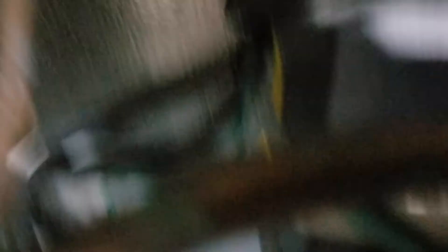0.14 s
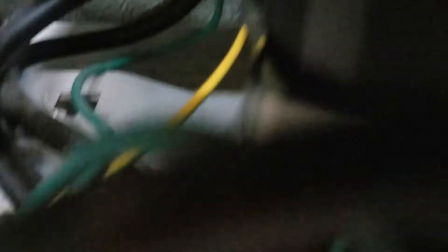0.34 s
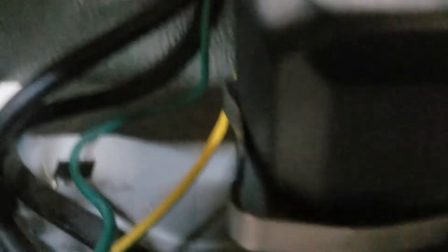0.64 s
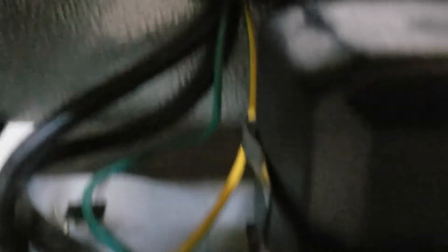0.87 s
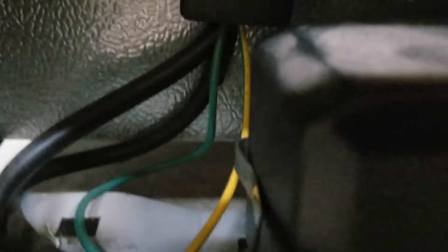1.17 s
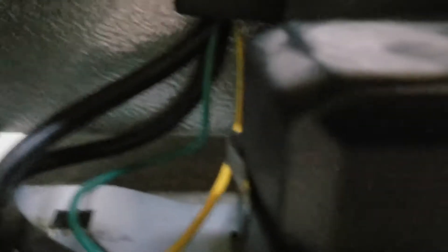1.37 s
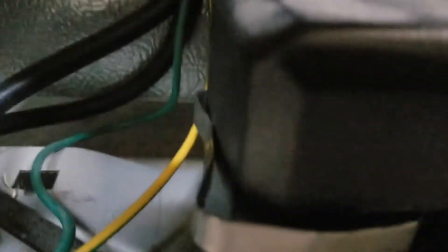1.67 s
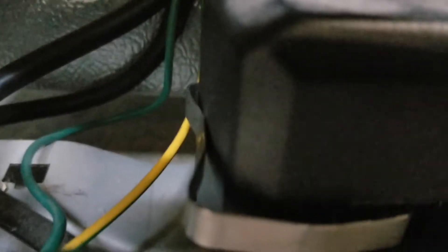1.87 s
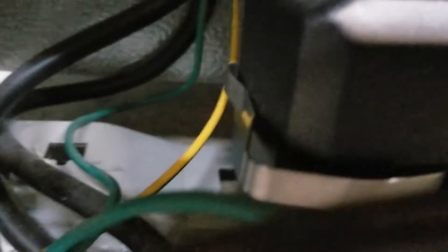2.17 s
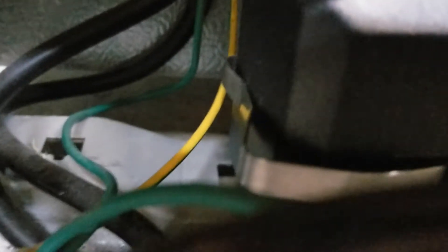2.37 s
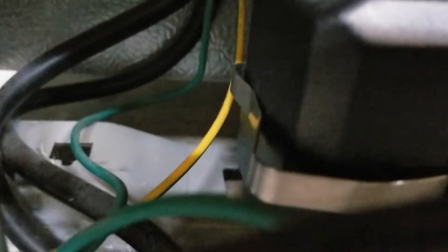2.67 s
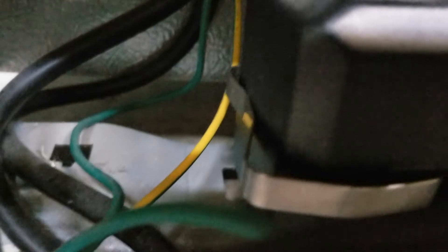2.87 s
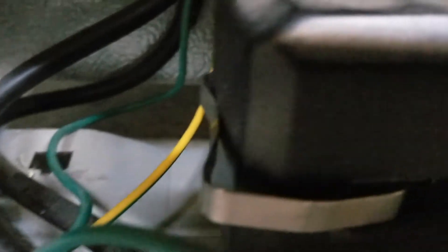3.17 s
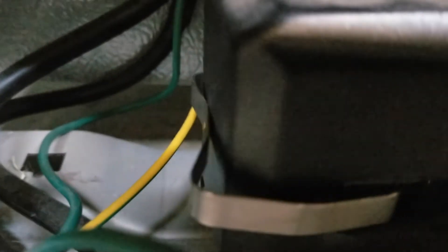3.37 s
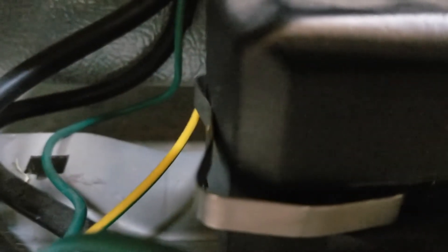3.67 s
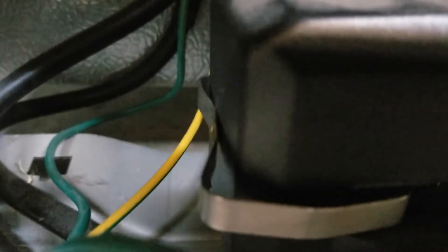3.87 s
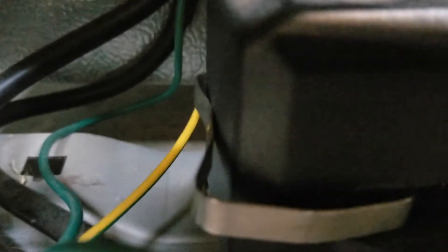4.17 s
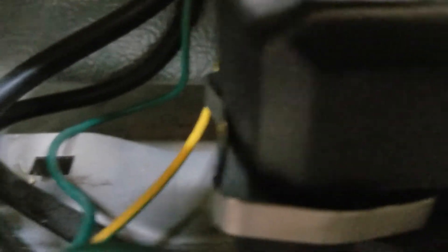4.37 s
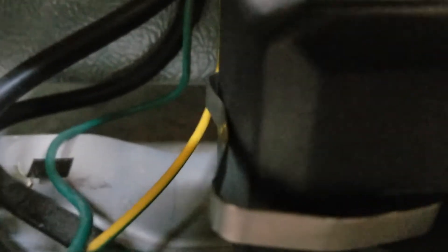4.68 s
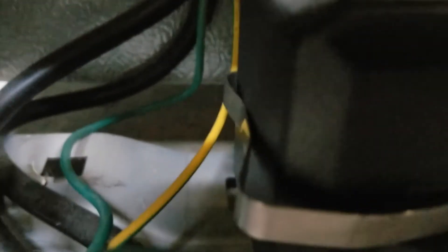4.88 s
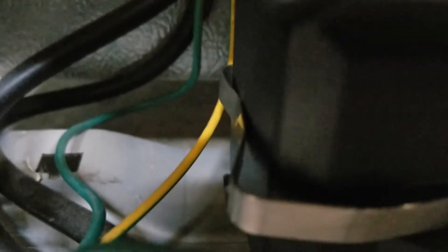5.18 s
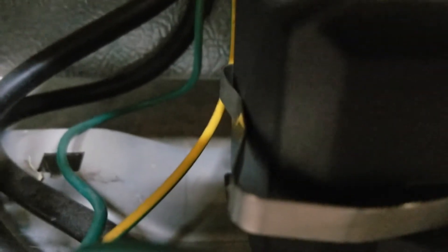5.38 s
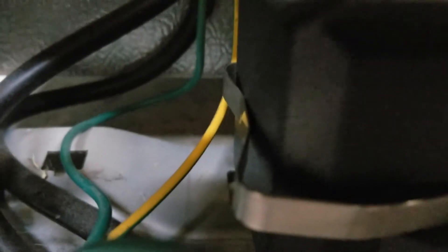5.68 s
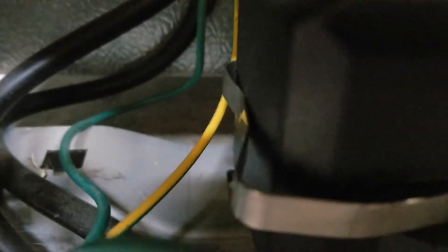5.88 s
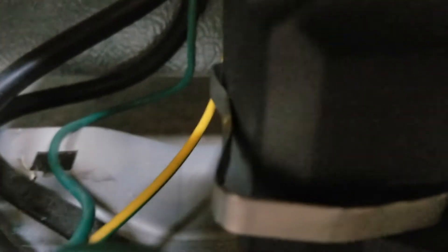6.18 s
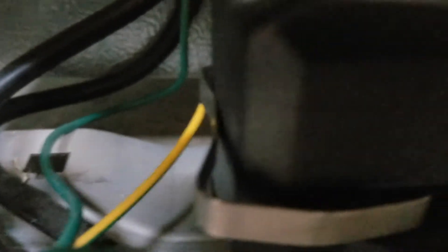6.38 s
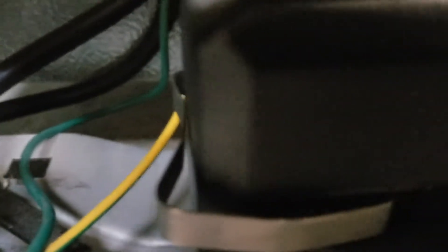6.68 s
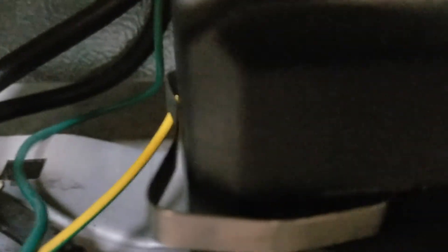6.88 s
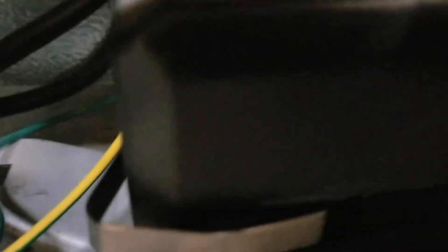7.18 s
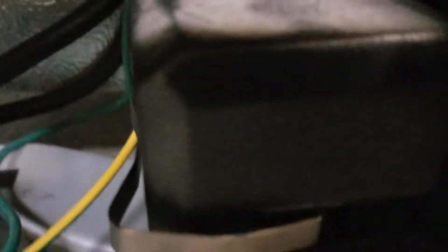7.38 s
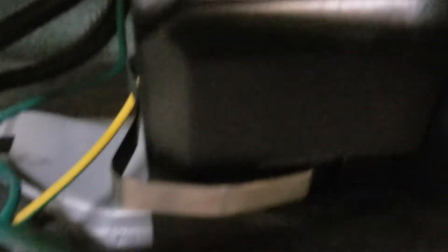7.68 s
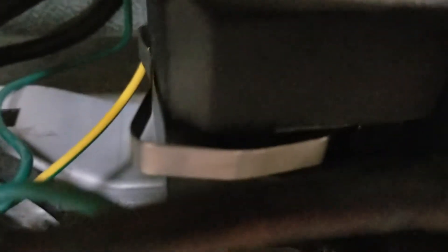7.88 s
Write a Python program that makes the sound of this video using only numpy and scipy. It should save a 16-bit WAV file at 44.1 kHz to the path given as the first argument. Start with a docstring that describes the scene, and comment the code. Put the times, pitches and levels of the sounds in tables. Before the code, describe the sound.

A phone bumps a pipe, a lorry shifts gear and booms past beyond the wall, and a stalled compressor hums between two metallic clicks.

```python
"""Close behind a small fridge: the stalled compressor's hum, steady sines at multiples of its magnetic
pull, swells up around one relay click and ends at another; each click is noise and ringing metal.
Outside a lorry changes gear and rolls past: sines at its engine orders boom through the wall over noise
bands of road, traffic and microphone hiss, with a turbo whine and faint high whistles.
The hand-held phone bumps a pipe, ringing its body, and brushes the wires: short bursts of noise."""
import sys
import numpy as np
from scipy import signal
from scipy.io import wavfile

SR = 44100
rng = np.random.default_rng(int(sys.argv[2]) if len(sys.argv) > 2 else 0)


def digitize_waveform(pressure):
    """Quantize a signal to 16-bit integers and store it at the path in sys.argv[1].

    Rows of a 2-D input are taken as channels; values are limited to [-1, 1].
    """
    field = np.atleast_2d(pressure).T
    bounded = np.clip(field, -1, 1)
    quanta = np.round(bounded * 32767).astype(np.int16)
    wavfile.write(sys.argv[1], SR, quanta)


def boost(x):
    """Linear amplitude factor 10**(x/20) for a level x in decibels (scalar or array-like)."""
    u = np.asarray(x, float) / 20
    return 10 ** u


N = 354784


def rms_one(x):
    """Normalisation: scale to unit root mean square."""
    return x / np.sqrt(np.mean(x ** 2) + 1e-20)


def in_time(rows):
    """Linear interpolation: the columns after the time, one value per sample."""
    s, *columns = np.transpose(rows)
    return [np.interp(np.arange(N) / SR, s, c) for c in columns]


def at_hz(points, hz):
    """Spectral interpolation: read a spectrum on a logarithmic frequency axis."""
    points_hz, db = np.transpose(points)
    return np.interp(np.log(hz), np.log(points_hz), db)


def sides(db):
    """Interaural level difference: left and right gains, left minus right in dB."""
    return boost(np.array([db / 2, -db / 2]).reshape(2, -1))


def gate(start, end, fade):
    """Linear envelope: 1 between two moments, with fades inside them, all in seconds."""
    t = np.arange(N) / SR
    return np.clip(np.minimum(t - start, end - t) / fade, 0, 1)


def drift(rate_hz):
    """Random modulation: noise through two equal low-pass poles at rate_hz, of spread 1."""
    r = np.exp(-2 * np.pi * rate_hz * 40 / SR)  # computed at every 40th sample
    slow = signal.lfilter([1], [1, -2 * r, r * r], rng.standard_normal(N // 40 + 2002))[2000:]
    return np.interp(np.arange(N) / 40, np.arange(len(slow)), rms_one(slow))


def ring(clicks, hz, t60):
    """Damped resonance: a unit click starts a sine of height 1 that falls 60 dB in t60 seconds."""
    r, w = boost(-60 / (t60 * SR)), 2 * np.pi * hz / SR
    return signal.lfilter([0, np.sin(w)], [1, -2 * r * np.cos(w), r * r], clicks + 1e-18)


def band(x, low_hz, high_hz):
    """Band-pass filtering: keep the partials between two frequencies."""
    return signal.sosfilt(signal.butter(3, [low_hz, high_hz], "band", fs=SR, output="sos"), x)


def tone(hz):
    """Phase integration: a sine of rms 1 along a pitch curve."""
    return np.sqrt(2) * np.sin(2 * np.pi * np.cumsum(hz) / SR)


# Compressor hum. Each row: multiple of the magnetic pull rate, mean level in dB, left-right in dB.
HUM = [(1, -40, 0), (4, -55, 15), (33, -94.5, 3), (36, -100, 3), (47, -100, 3), (48, -97, 3)]


def compressor():
    """Magnetostatic pull: a locked rotor is pulled twice per mains cycle, and the shell sounds multiples."""
    pull_hz, on_s, off_s = 119.95, 2.54, 5.836
    hum = 0
    for k, db, pan_db in HUM:
        flicker_db = (1 + k / 20) * drift(12)  # high multiples are less steady
        hum = hum + sides(pan_db) * boost(db + flicker_db) * tone(np.full(N, k * pull_hz))
    return hum * np.minimum(gate(on_s, 9, 0.82), gate(0, off_s, 0.016))


# Start relay, then overload switch. Each row: start in seconds, level in dB, left-right in dB.
RELAY = [(3.1452, -27, 5.5), (5.832, -40, 4.5)]
# Metal parts, one list a switch. Each row: frequency in Hz, relative level in dB, t60 in seconds.
RELAY_MODES = [
    [(2600, -28.5, 0.058), (3214, -18, 0.031), (3960, -14, 0.054), (4050, -13.5, 0.05), (4210, -16.5, .035),
     (4570, -11.5, 0.03), (5270, -15.5, 0.022), (7080, -18.5, 0.047), (7700, -20, 0.041),
     (10500, -17.5, 0.037), (12030, -17.5, .04), (14000, -15, .03), (14200, -34, 0.11), (15600, -14, .02)],
    [(3030, -5.5, 0.022), (4700, -14.5, .025), (5900, -12, 0.027), (6600, -12.5, 0.018),
     (10200, -11.5, 0.019), (12230, -15, .02), (13742, -7.5, .025), (15000, -6, 0.0254), (15600, -7.5, .03)],
]
# Spectrum of the crack, one list a switch. Each row: frequency in Hz, relative level in dB per Hz.
RELAY_CRACK = [
    [(1180, -55), (2000, -26), (3430, -17), (3950, -10), (4920, -13), (8000, -3), (8890, -18.5),
     (13700, -10), (16500, -17.5)],
    [(1470, -30.5), (2500, -0.5), (3170, 2), (4080, -31), (4520, -7.5), (5870, -8.5), (7860, -9.5),
     (15100, -3.5), (16500, -12.5)],
]


def evenly(rings, t60):
    """Energy normalisation: each channel gets that of a sine of height 1 dying in t60 seconds."""
    energy = (rings ** 2).sum(axis=1, keepdims=True)
    return rings * np.sqrt(t60 * SR / (4 * np.log(1000)) / energy)


def relay(rattle_s=.0035, crack_t60=.022, tail_db=-22, tail_t60=.2):
    """Impact excitation: rattling contacts give a crack, ringing metal and a short tail in the recess."""
    out, t = np.zeros((2, N)), np.arange(SR // 2) / SR
    edges = np.geomspace(2000, 16500, 17)
    rise = np.clip(t / .002, 0, 1) ** 2  # light touches first, then the full snap
    fall = boost(-60 * np.maximum(t - rattle_s, 0) / crack_t60)
    tail = boost(tail_db - 60 * t / tail_t60)
    for (s, db, pan_db), modes, crack in zip(RELAY, RELAY_MODES, RELAY_CRACK):
        white = rng.standard_normal((2, len(t)))
        white = white + 0.55 * white[::-1]  # the ports hear partly the same
        noise = 0
        for low, high in zip(edges, edges[1:]):
            noise = noise + boost(at_hz(crack, np.sqrt(low * high))) * band(white, low, high)
        touches = (t < rattle_s) * (rng.random(len(t)) < 6000 / SR)  # 6000 a second on average
        clicks = rng.standard_normal(len(t)) + .4 * rng.standard_normal((2, len(t)))
        clicks = clicks * rise * touches
        clicks = clicks / np.sqrt((clicks ** 2).sum(axis=1, keepdims=True) + 1e-12)
        rings = 0
        for hz, mode_db, t60 in modes:
            gain = boost(mode_db + rng.normal(0, 1.0, (2, 1)))
            rings = rings + gain * evenly(ring(clicks, hz, t60), t60)
        at = round(s * SR)
        snap = boost(-11.0) * rms_one(noise) * rise * (fall + tail) + rings
        out[:, at:at + len(t)] += boost(db) * sides(pan_db) * snap
    return out


# Engine coming, changing gear, passing, leaving.
# Each row: time in seconds, engine cycle rate in Hz, level in dB before order and wall gains.
LORRY = [(.25, 42.63, -69), (.5, 44.06, -69.5), (.77, 45.82, -58), (1.18, 45.73, -58.5),
         (1.449, 50.17, -56), (1.54, 50.25, -63.5), (1.6, 42.2, -60), (1.81, 43.76, -52.5),
         (2.31, 43.79, -58.5), (2.85, 43.76, -43.5), (3.199, 42.7, -49.5), (3.441, 41.48, -43.5),
         (3.67, 39.51, -44.5), (3.861, 38.1, -39.5), (3.99, 37.04, -41.5), (4.07, 35.9, -46),
         (4.3, 34.35, -45), (4.9, 34.09, -48), (5.2, 33.88, -51), (5.8, 33.47, -46.5), (6.42, 32.52, -51),
         (6.75, 31.55, -45.5), (7.0, 31.21, -54), (7.25, 31.7, -63.5)]
# Engine orders. Each row: multiple of the cycle rate, then gains in dB from afar, from the front, from behind.
ORDERS_HEARD = [(2, 3, 1.5, -5.5), (3, 10, 11.5, -4), (4, -1.5, 5, 13.5), (5, -5, -5, -12),
                (6, 1.5, -1.5, -6.5), (7, -13.5, -3, -7), (8, -7, -3, -5.5), (9, -7, 0, -9.5),
                (10, -13, -15.5, -6.5), (11, -17, -12, -5.5)]
# What wall and room let through. Each row: frequency in Hz, gain in dB.
WALL = [(60, 1.5), (78, 1.5), (87, 6), (100, -3.5), (118, -7.5), (131, 3), (145, 1), (170, 4), (200, -1.5),
        (230, -2.5), (262, 8.5), (280, 2), (305, 6.5), (330, -2.5), (350, -3.5), (400, -13), (520, -15)]
# Brief dips of one order. Each row: centre in seconds, multiple, depth in dB, half width in seconds.
DIPS = [(1.2, 6, -11, 0.63), (1.0, 2, -8, 0.3), (3.6, 3, -12, .6), (3.4, 2, -11, .15), (2.8, 7, -10, .2),
        (1.9, 3, -16.5, 0.39), (4.09, 4, -5, 0.047), (4.57, 4, -19, 0.19), (6.54, 4, -9.5, .1)]


def lorry(waver_db=2.0, wander=.25):
    """Harmonic radiation: wavering engine orders swell as they glide through resonances of wall and room."""
    hz, level_db = in_time(LORRY)
    t, turn = np.arange(N) / SR, 2 * np.pi * np.cumsum(hz) / SR
    near = gate(2.366, 99, 0.42)  # comes into view
    behind = gate(3.89, 99, 0.54)  # turns its rear
    drone = 0
    for k, far_db, front_db, rear_db in ORDERS_HEARD:
        aspect_db = far_db + (front_db - far_db) * near + (rear_db - front_db) * behind
        db = level_db + aspect_db + at_hz(WALL, k * hz) + waver_db * drift(9.9)
        for s, order, depth_db, width in DIPS:
            if order == k:
                db = db + depth_db * np.clip(1 - abs(t - s) / width, 0, 1)
        phase = rng.uniform(0, 2 * np.pi) + wander * drift(6.4)  # radians
        drone = drone + boost(db) * np.sqrt(2) * np.sin(k * turn + phase)
    leaving_pan_db = -2.5 * behind
    return sides(leaving_pan_db) * drone * gate(LORRY[0][0] - .1, LORRY[-1][0] + 0.15, .1)


# Whine of the turbo. Each row: time in seconds, frequency in Hz, level in dB.
TURBO = [(2.2, 6107, -102), (2.6, 6600, -87.5), (3.5, 6970, -79.5), (4.2, 7060, -83), (4.5, 6600, -83),
         (4.7, 6370, -102)]


def turbo():
    """Amplitude modulation: a gliding sine times random drift becomes the breathy whine of the turbo."""
    hz, db = in_time(TURBO)
    return boost(db) * tone(hz) * [drift(200), drift(200)] * gate(TURBO[0][0], TURBO[-1][0], .05)


# Contacts of the bump. Each row: time in seconds, left push in dB, right push in dB, cut-off in Hz.
BUMP = [(.1631, -7.5, -4.2, 2600), (.1641, 3.9, -15, 1315), (.1683, -1.6, -23.5, 494),
        (.1760, -16, -20, 1250), (.1770, -8, -32, 800)]
# Phone body. Each row: frequency in Hz, t60 in seconds, swing at the left port, swing at the right port.
# Opposite signs where the body rocks.
PHONE = [(60, .1, -.0051, .0025), (108, .027, -.034, .0033), (244, .0135, -.19, .036),
         (1215, .0035, 1.44, -1.35), (1850, .0024, .09, 1.75), (3450, .05, .004, .012),
         (3720, .07, .005, .016), (4700, .0025, .6, 1.3), (6800, .005, .25, .3)]


def bump():
    """Modal excitation: soft contacts, each a low-passed push, and a slower shove ring the phone body."""
    pushes, shove = np.zeros((2, N)), np.zeros(N)
    for s, left_db, right_db, cut_hz in BUMP:
        click = np.zeros(N)
        click[round(s * SR)] = -1
        push = signal.lfilter(*signal.butter(3, cut_hz, fs=SR), click + 1e-18)
        pushes += boost([[left_db], [right_db]]) * push
    shove[round(.1667 * SR)] = -boost(27.7)
    shove = signal.sosfilt(signal.butter(3, 93, fs=SR, output="sos"), shove + 1e-18)
    rock, knock = 0, 0
    for hz, t60, left, right in PHONE:
        rock = rock + ring(shove, hz, t60) * left
        knock = knock + ring(pushes, hz, t60) * [[left], [right]]
    rock = rock * [[1], [-.7]]  # the shove tips the body: the ports swing against each other
    sway = ring(shove, 60, .11) * [[-.001], [.006]]  # slow
    return rock + sway + knock


# Wires on the case. Each row: start in seconds, level in dB 10 above the initial rms, left-right in dB.
TICKS = [(0.253, -51.5, 14), (0.3406, -52, 12), (0.372, -57.5, 12.5), (0.798, -49, 8), (6.3967, -53.5, 3)]


def ticks():
    """Transient decay: wires touching the case give bright noise that falls 60 dB in 13 ms."""
    out, t = np.zeros((2, N)), np.arange(N) / SR
    bright = rms_one(band(rng.standard_normal((2, N)), 2200, 16000))
    for s, db, pan_db in TICKS:
        fall = boost(db - 10 - 60 * np.maximum(t - s, 0) / 0.013) * (t >= s)
        out += fall * sides(pan_db) * bright
    return out


# Brushing, air puffs, the crack of the bump and a switch rattle.
# Each row: start in seconds, time to fall 12 dB in seconds, level in dB, low edge in Hz, high edge in Hz.
NOISE_BURSTS = [(0.167, 0.008, -54, 2177, 6980), (0.0, 0.12, -69.5, 1995, 5470),
                (0.0, 0.4, -81, 9900, 15770), (0.1627, 0.0013, -29.5, 2600, 7310),
                (0.1628, 0.0023, -44, 10000, 15800), (0.172, 0.2, -69.5, 2530, 7460),
                (0.503, 0.046, -72, 1790, 6760), (0.602, 0.28, -76.5, 2480, 7160),
                (0.778, 0.036, -73, 2480, 7000), (3.364, 0.18, -54.5, 2110, 2870),
                (3.37, .12, -61, 3000, 7150), (4.909, .015, -70, 4500, 5537),
                (5.857, 0.038, -67.5, 2810, 3800)]


def noise_bursts():
    """Exponential decay: brushing, puffs, the bump's crack and a switch rattle as band-passed noise."""
    out, t = np.zeros((2, N)), np.arange(N) / SR
    white = rng.standard_normal((2, N))
    for s, length, db, low_hz, high_hz in NOISE_BURSTS:
        fall = boost(-12 * np.clip((t - s) / length, 0, 9)) * gate(s, s + 3 * length, length / 10)
        out += boost(db) * fall * rms_one(band(white, low_hz, high_hz))
    return out


# Thin high whistle. Each row: time in seconds, mean frequency in Hz, mean level in dB.
WHISTLE = [(.6, 10080, -100), (1.6, 10620, -99), (2.6, 10580, -90.5), (3.1, 10560, -88),
           (3.9, 10500, -94.5), (4.2, 10520, -95.5), (5.3, 10280, -92.5), (6.4, 10200, -99.5),
           (7.6, 10020, -99.5), (8.04, 10250, -109)]


def whistle():
    """Random modulation: a faint high sine, unsteady in pitch and level, mostly on the left."""
    hz, db = in_time(WHISTLE)
    thin = boost(db + 3.6 * drift(25)) * tone(hz + 30 * drift(40))
    return sides(5.4) * thin * gate(WHISTLE[0][0], 9, .3)


# Short high chirp. Each row: time in seconds, mean frequency in Hz, level in dB.
CHIRP = [(3.88, 8820, -100), (3.93, 9150, -76), (3.97, 9100, -76), (4.02, 8900, -76.5), (4.05, 8900, -105)]


def chirp():
    """Frequency modulation: a brief high sine with an unsteady glide, mostly on the left."""
    hz, db = in_time(CHIRP)
    short = boost(db) * tone(hz + 30 * drift(40))
    return sides(4.0) * short * gate(CHIRP[0][0], CHIRP[-1][0], .01)


def steady_tone():
    """Narrow-band modulation: a faint low sine, wavering in pitch and level, stays throughout."""
    return boost(-60.5 + 3 * drift(5)) * tone(296.8 + 1.5 * drift(3.5))


# Spectrum of the background: traffic rumble low, microphone hiss above about 2.5 kHz.
# Each row: frequency in Hz, relative level in dB per Hz.
COLOUR = [(22, -22), (35, -13), (55, 3.5), (116, 1), (160, -1.5), (281, -5), (403, -17), (620, -19),
          (850, -17), (1500, -23), (1700, -31), (2400, -42.5), (2800, -54.5), (3300, -53.5)]
TREBLE = [(4200, -60), (6300, -58.5), (7600, -61), (9000, -61.5), (10500, -56), (13000, -49.5),
          (15500, -49.5)]
# Stereo correlation. Each row: frequency in Hz, left-right likeness from -1 to 1.
LIKENESS = [(60, 1), (120, 0.8), (240, 1), (480, .6), (950, 0.32), (1900, 0.23), (3800, 0), (15000, 0)]
# Stereo balance. Each row: frequency in Hz, left-right in dB.
LEAN = [(60, 0), (110, -2), (200, -4), (380, 6.5), (700, -3), (1290, -1.5), (2380, -3.5), (4400, 2),
        (8120, 1.5), (15000, 5)]
# Swells of the background, as of distant traffic. Each row: time in seconds, relative level in dB.
SWELLS = [(0, -2), (.5, -4.5), (2.3, -4), (2.9, 1), (6.5, -0.5), (8.04, 1)]
# Road noise of the lorry. Each row: time in seconds, level in dB against its reference.
ROAD = [(0, -29), (1.2, -21.5), (2.3, -17.5), (2.8, -6.5), (3.38, -1), (3.9, -5), (4.4, -8), (5.3, -11.5),
        (6.1, -15), (8.04, -20)]
# Road reference over the background. Each row: frequency in Hz, ratio in dB.
ROAD_OVER_BACKGROUND = [(30, 5), (70, 0), (330, 12), (1100, 2.5), (4500, 19), (8000, 10), (13000, -2.5)]


def background(patchy_db=1.5):
    """Incoherent summation: powers of background and lorry road noise add in quarter-octave bands."""
    (swell_db,), (road_db,) = in_time(SWELLS), in_time(ROAD)
    base, road = boost(swell_db) ** 2, boost(road_db) ** 2
    edges, out = 22 * 2 ** (np.arange(39) / 4), 0
    white = rng.standard_normal((2, 2, N + 8192))  # neighbouring bands use different noise
    for k, (low, high) in enumerate(zip(edges, edges[1:])):
        mid, side = band(white[k % 2], low, min(high, 15800))[:, 8192:]
        hz = np.sqrt(low * high)
        swell = np.sqrt(base + road * boost(at_hz(ROAD_OVER_BACKGROUND, hz)) ** 2)
        alike = at_hz(LIKENESS, hz)
        colour = boost(at_hz(COLOUR + TREBLE, hz) + patchy_db * drift(8))
        stereo = np.sqrt(1 + alike) * mid + np.sqrt(1 - alike) * side * [[1], [-1]]
        out = out + swell * colour * sides(at_hz(LEAN, hz)) * stereo
    ending = out[:, -N // 9:]
    return boost(-39.5) * out / np.sqrt(np.mean(ending ** 2))  # the last ninth sets the level


def scene():
    """Superposition at two ports: background, lorry drone and low tone reach the right 15 samples late."""
    left, right = background() + lorry() + steady_tone()
    lagged = np.array([left, np.roll(right, 15)])
    fridge = compressor() + relay()
    contacts = bump() + ticks() + noise_bursts()
    return lagged + fridge + contacts + whistle() + chirp() + turbo()


def top_cut(x):
    """Nothing passes above the cut-off."""
    return signal.sosfilt(signal.butter(12, 17140, fs=SR, output="sos"), x)


def record(dry):
    """Transducer response: microphones lose deep bass and a stretch of treble; full scale is the ceiling."""
    heard = signal.sosfilt(signal.butter(2, 30, "high", fs=SR, output="sos"), dry)
    dip_hz, dip_width_hz, dip_share = 8700, 3400, 0.61  # the ports hear less here
    lost = signal.lfilter(*signal.iirpeak(dip_hz, dip_hz / dip_width_hz, fs=SR), heard)
    mix = np.clip(heard - dip_share * lost, -1, 1)
    return top_cut(mix)


dry = scene()
out = record(dry)
digitize_waveform(out)
```